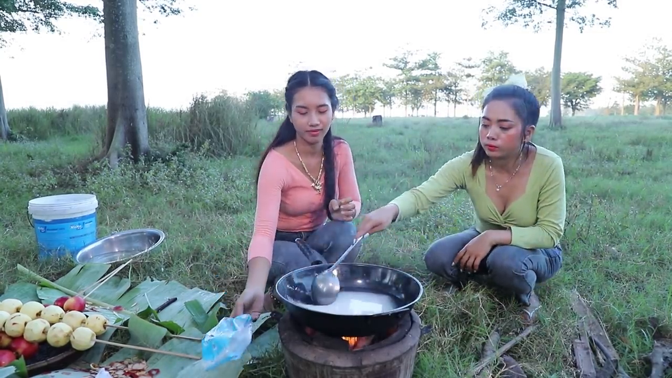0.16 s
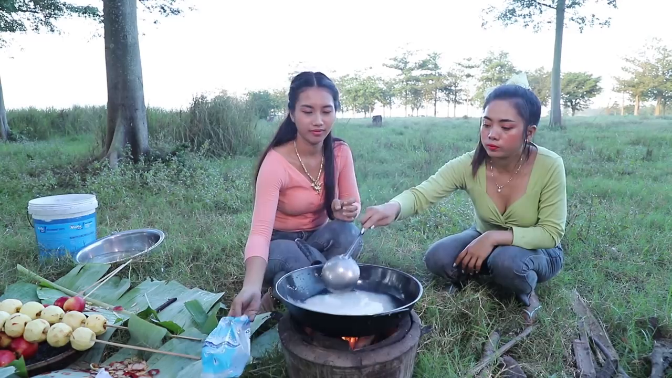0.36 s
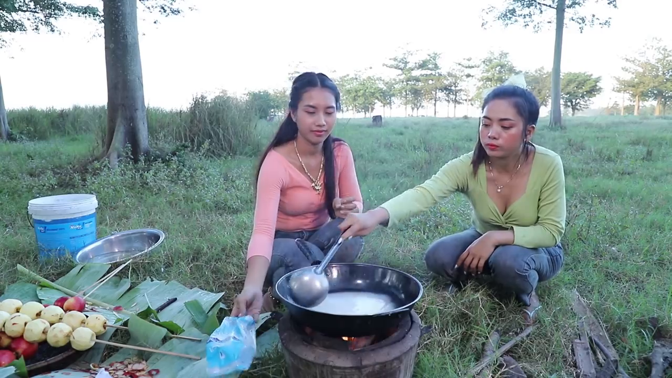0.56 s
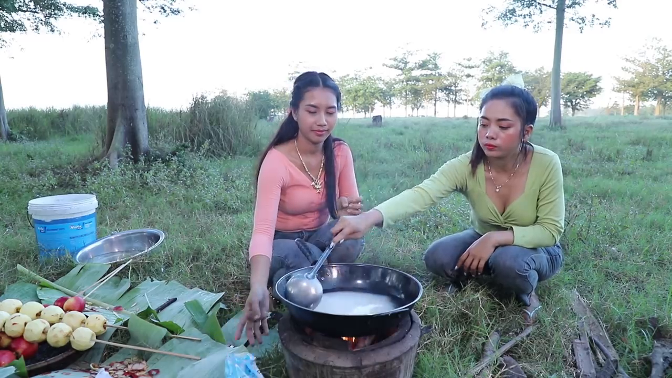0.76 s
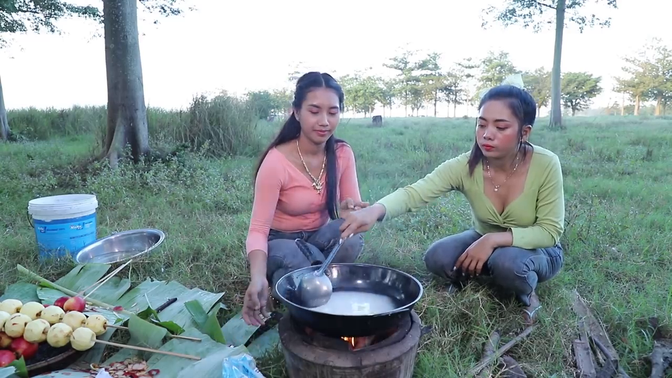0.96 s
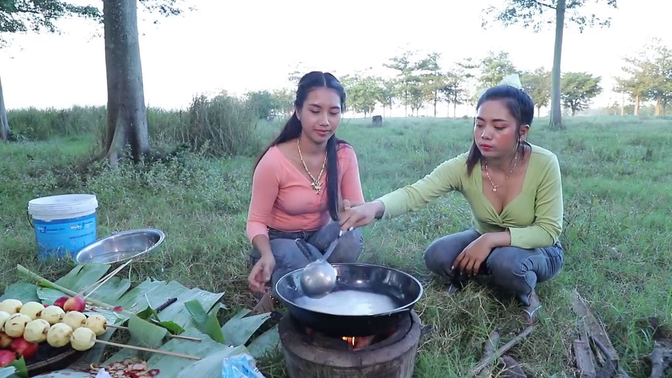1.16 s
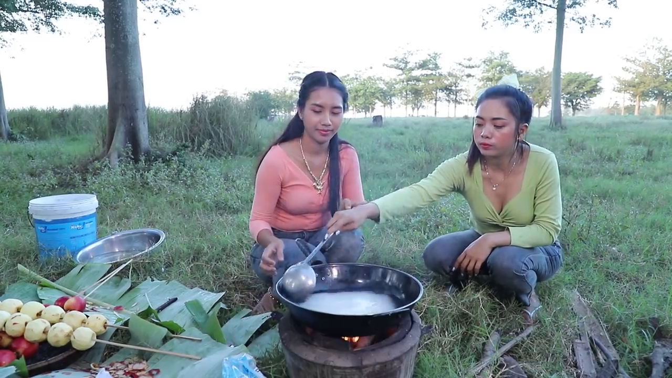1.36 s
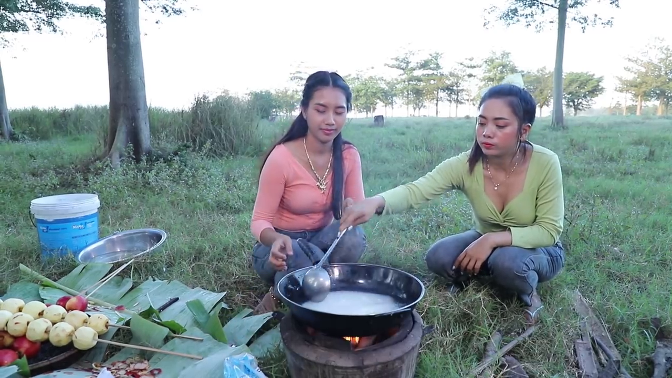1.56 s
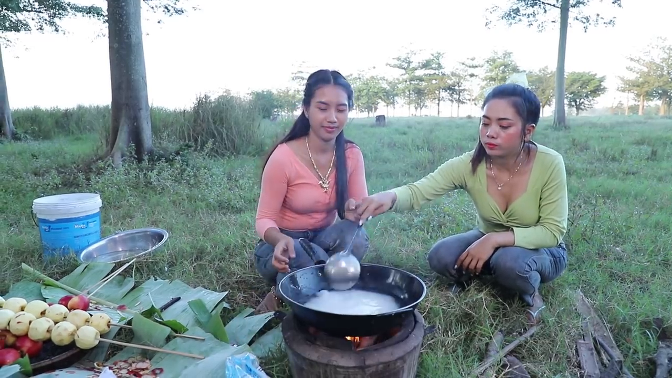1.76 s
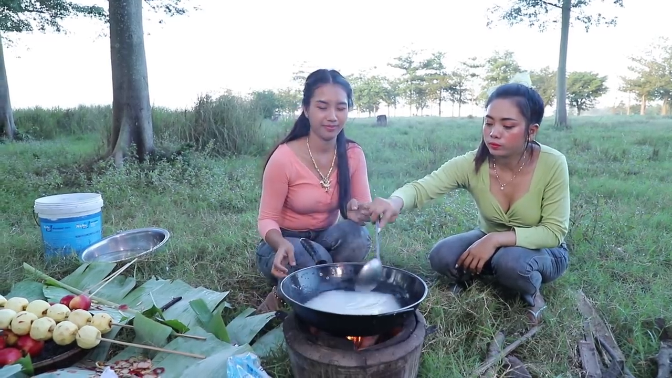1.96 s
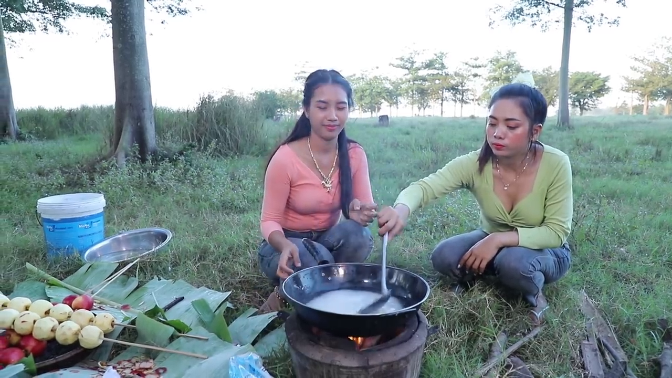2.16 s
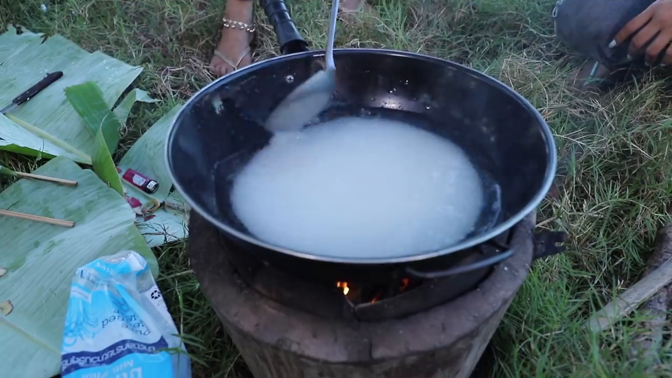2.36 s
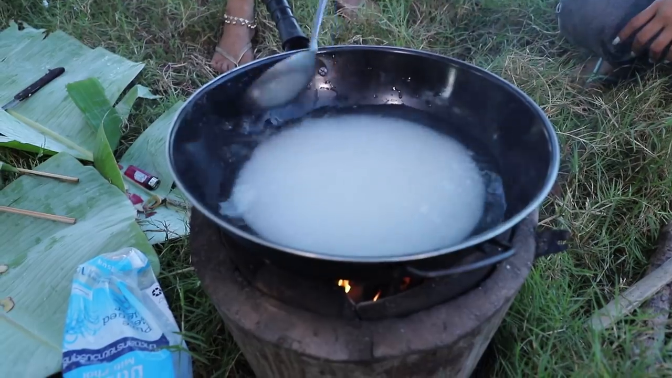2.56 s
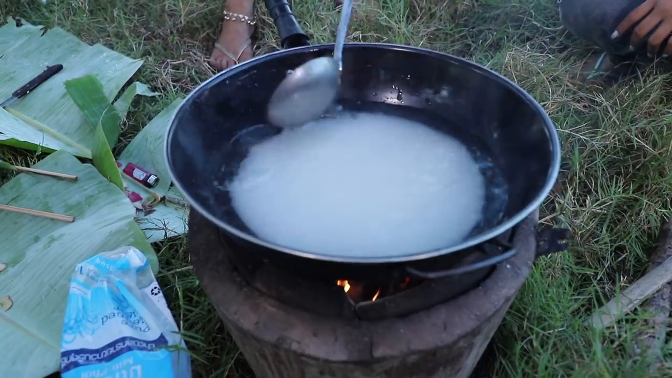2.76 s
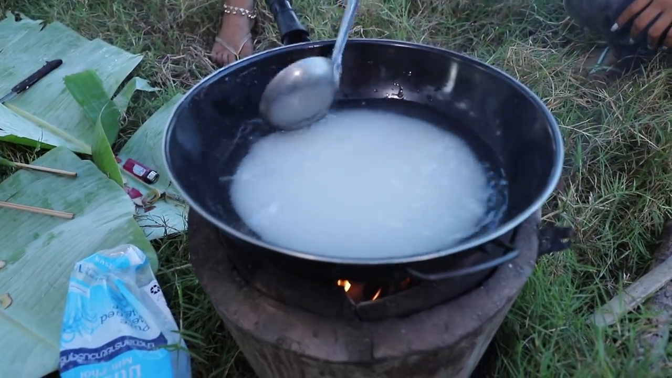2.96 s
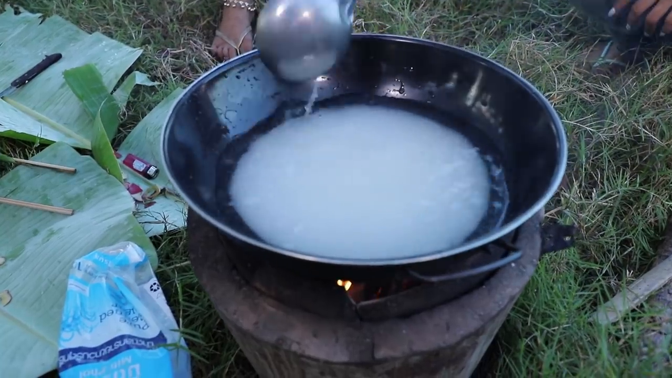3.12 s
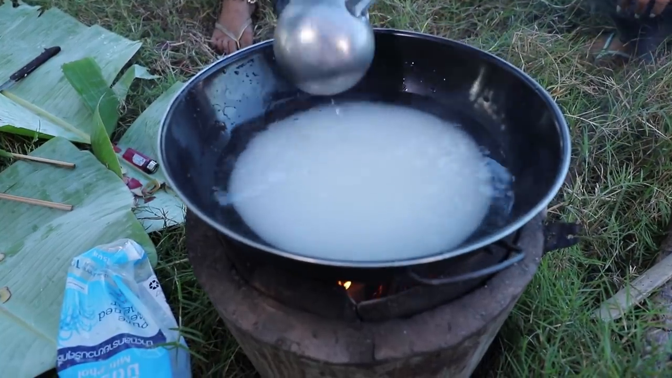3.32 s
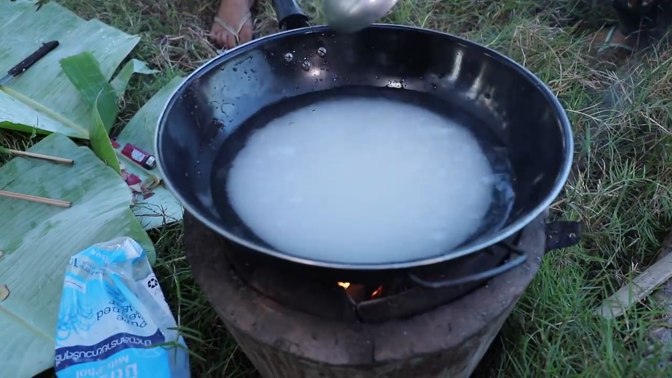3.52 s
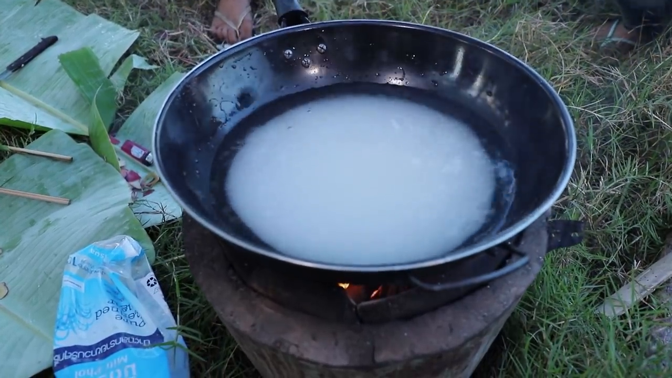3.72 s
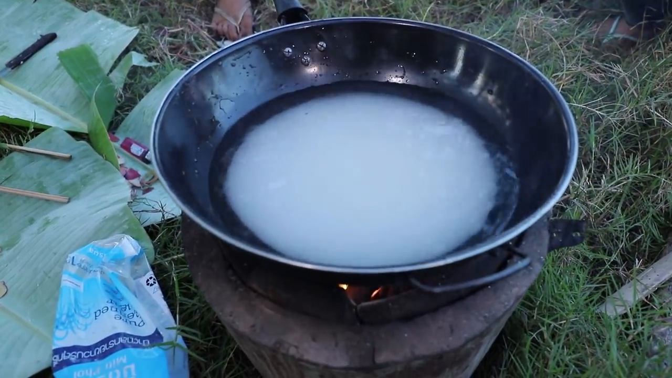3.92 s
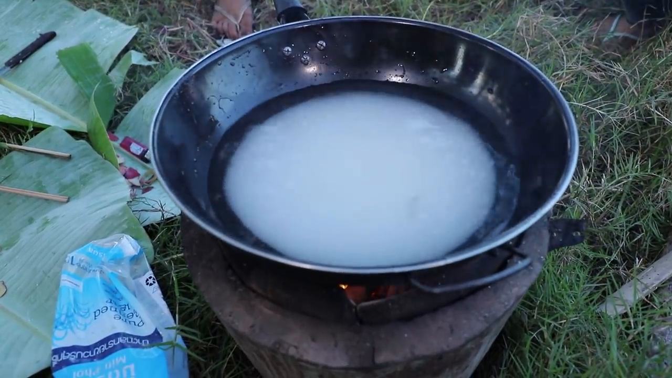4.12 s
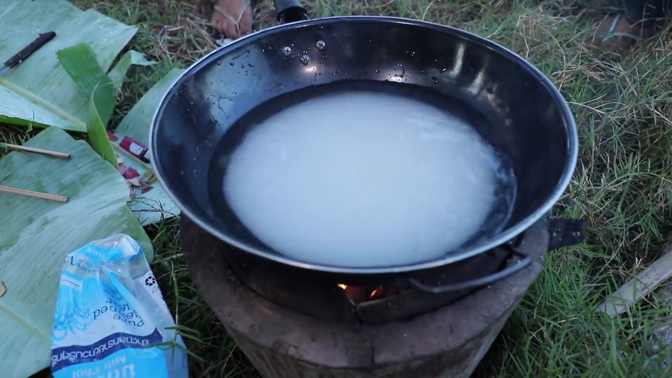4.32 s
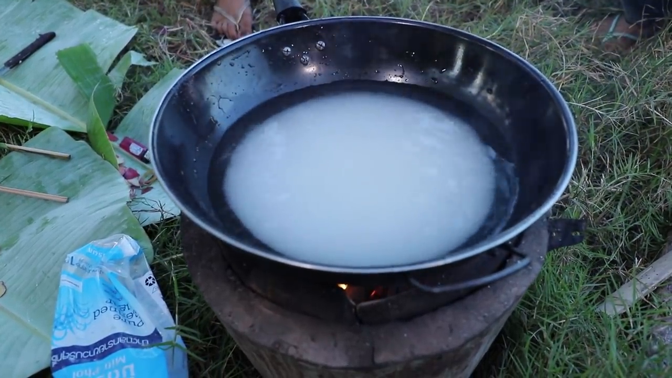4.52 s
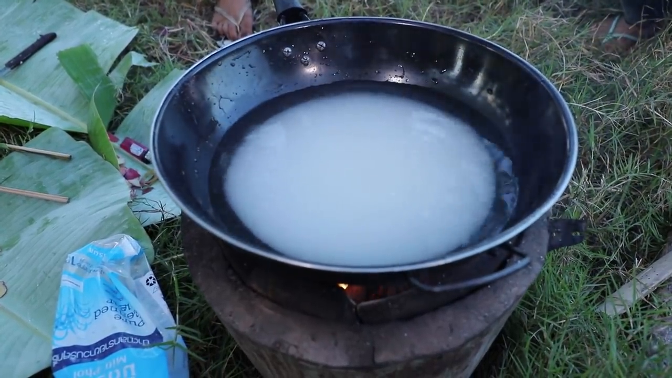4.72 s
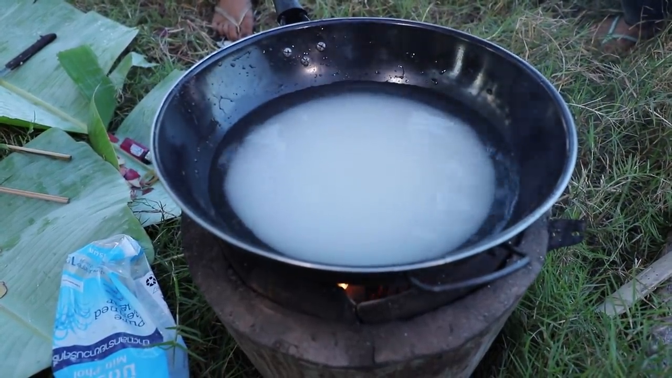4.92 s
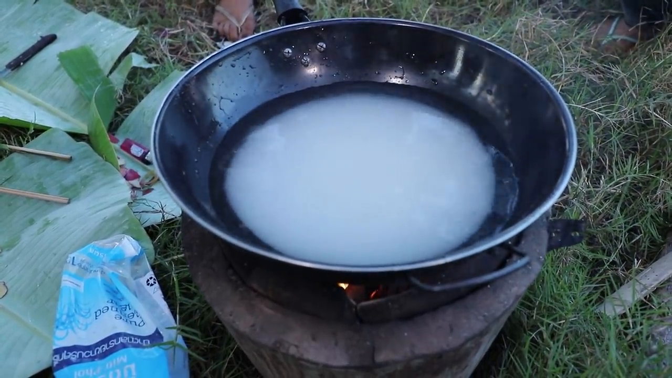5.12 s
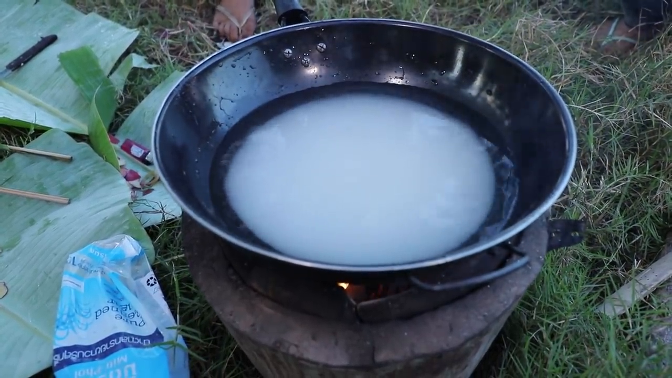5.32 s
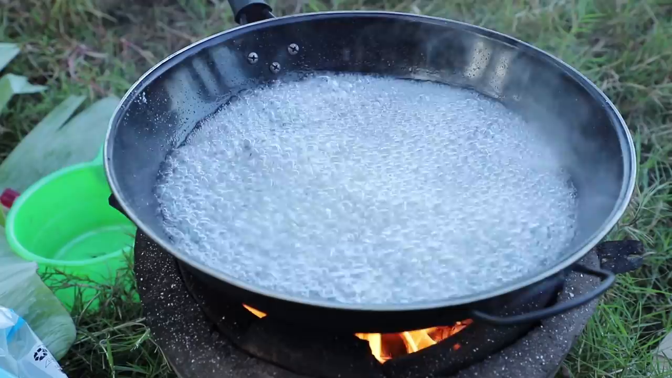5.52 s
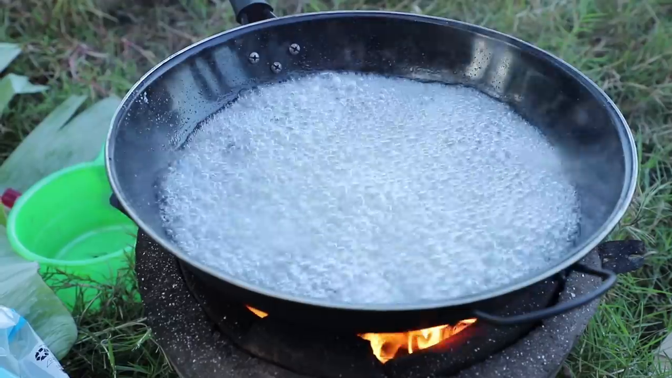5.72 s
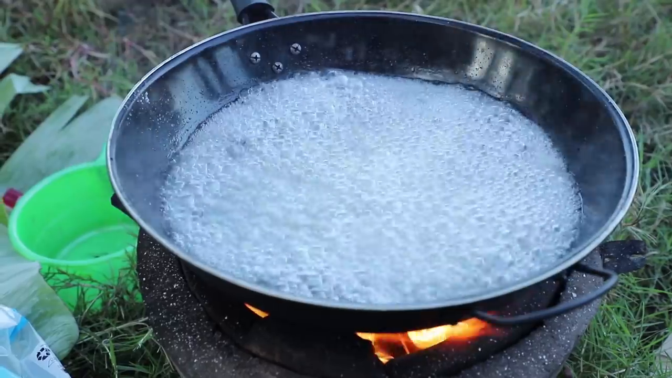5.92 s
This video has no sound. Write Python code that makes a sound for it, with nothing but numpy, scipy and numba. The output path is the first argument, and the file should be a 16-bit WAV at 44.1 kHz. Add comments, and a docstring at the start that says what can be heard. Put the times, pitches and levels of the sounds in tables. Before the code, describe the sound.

A metal ladle scrapes and knocks in a steel wok among buzzing insects, two loud clanks follow, then a cricket chirps and syrup boils.

```python
"""A ladle scrapes and squeals on a steel wok of hot sugar syrup, under bush crickets, a cricket trill and far engines.
Knocks ring the modes of the pan, stick-slip clicks drive them in scrapes, single wavering modes squeal.
Noise bursts make spits, ticks and fire snaps; gliding sines make the insects; slow sines make the drones.
Three scenes parted by short silences: wide, close with drips and a chirping cricket, then a foaming boil alone."""
import sys
import numpy as np
from scipy import signal
from scipy.fft import rfft, irfft, next_fast_len
from scipy.io import wavfile
from scipy.ndimage import uniform_filter1d
from numba import njit

SR = 44100
rng = np.random.default_rng(int(sys.argv[2]) if len(sys.argv) > 2 else 0)


def output_pcm(signal):
    """Save a mono or channel-first signal as 16-bit PCM at the path in sys.argv[1].

    Samples are clipped to [-1, 1] before scaling.
    """
    pcm = np.clip(np.atleast_2d(signal).T, -1, 1) * 32767
    wavfile.write(sys.argv[1], SR, np.round(pcm).astype(np.int16))


N = 263718
T = np.arange(N) / SR

# scenes: start [s], end [s]
WIDE, CLOSE, LATER = (0, 2.312), (2.348, 5.550), (5.589, 6.0)


def undb(db):
    """Decibels to gain."""
    return 10 ** (np.asarray(db) / 20)


def unit(x):
    """Scale to a standard deviation of 1."""
    return x / (np.std(x) + 1e-12)


def curves(rows):
    """Columns of a table as straight-line automation over time."""
    times, *columns = np.transpose(rows)
    return [np.interp(T, times, column) for column in columns]


def gate(start, end, ramp=0.00057):
    """1 between two times, with short ramps."""
    return np.clip((T - start) / ramp, 0, 1) * np.clip((end - T) / ramp, 0, 1)


def swell(start, length, attack, release):
    """Envelope of attack, hold and release."""
    return np.clip((T - start) / attack, 0, 1) * np.clip((start + length - T) / release, 0, 1)


def fade(t, t60):
    """Exponential decay by 60 dB in t60 seconds."""
    return np.exp(-np.log(1000) * t / max(t60, 1e-3))


def by_scene(wide_db, close_db):
    """Gain of a steady sound in the wide scene and after it."""
    return undb(np.where(T < WIDE[1], wide_db, close_db))


def walk(rate):
    """Random modulation: levels held 1 / rate s and smoothed twice; spread near 1."""
    hold = max(int(SR / rate), 1)
    steps = np.repeat(rng.standard_normal(N // hold + 1), hold)
    return 1.3 * uniform_filter1d(uniform_filter1d(steps, hold), hold)[:N]


def noise_at(size, hz):
    """A short random tremble of spread near 1, about hz changes a second."""
    place = np.arange(size) * hz / SR
    return np.interp(place, np.arange(SR // 100), rng.standard_normal(SR // 100))


def colour(x, points):
    """Causal (minimum-phase) filter through (frequency [Hz], gain [dB]) points."""
    size = 2 * next_fast_len(len(x))
    hz, db = np.transpose(points)
    bins = np.log(np.fft.rfftfreq(size, 1 / SR) + 1)
    log_gain = np.log(undb(np.interp(bins, np.log(hz), db)))
    # folding the cepstrum onto positive times makes the filter causal
    cepstrum = irfft(log_gain)
    cepstrum[1:size // 2] *= 2
    cepstrum[size // 2 + 1:] = 0
    return irfft(rfft(x, size) * np.exp(rfft(cepstrum)))[:len(x)]


def noise(points):
    """Coloured noise of rms 1."""
    return unit(colour(rng.standard_normal(N), points))


def crackle(rate, spread_db):
    """Random clicks of very unequal size, rms 1."""
    size = undb(spread_db * np.minimum(rng.exponential(size=N), 2 * np.pi))
    return unit((rng.random(N) < rate / SR) * size * rng.choice([-1, 1], N))


def add(out, s, x):
    """Mix x into out at time s."""
    i = max(int(s * SR), 0)
    out[i:i + len(x)] += x[:max(N - i, 0)]


def bursts(rows, points, t60):
    """A short, dying puff of coloured noise for each (time [s], level [dB]) row."""
    out, t = np.zeros(N), T[:SR // 12]
    for s, db in rows:
        puff = unit(colour(rng.standard_normal(len(t)), points))
        add(out, s, undb(db) * puff * fade(t, t60))
    return out


@njit
def resonate(x, hz, width):
    """Band-pass with a moving centre, gain 1 there."""
    y, band, low = np.empty(len(x)), 0., 0.
    for i in range(len(x)):
        g, damping = np.tan(np.pi * hz[i] / SR), width / hz[i]
        v = (band + g * (x[i] - low)) / (1 + g * (g + damping))
        band, low, y[i] = 2 * v - band, low + 2 * g * v, damping * v
    return y


# modes of the wok with the ladle against it: (frequency [Hz], level [dB], t60 [s])
WOK_MODES = [(175, -17, .15), (345, -14, .25), (520, -15, .1), (829, -10, .11), (1060, -6, .08),
             (1290, -8, .04), (1465, -10, .12), (1720, -10, .05), (2080, -15, .08), (2280, -14, .09),
             (2860, -2, .05), (3410, -12, .1), (3880, -21, .11), (4250, -15, .04), (5120, -9, .05),
             (5550, -8, .035), (6800, -3, .024), (7200, -4, .025), (8130, -5, .04), (8730, -4, .027),
             (9650, -12, .03), (12450, -11, .035), (12950, -10, .025), (14550, -8, .025)]
# tone of stick-slip rubbing: (frequency [Hz], gain [dB])
RUB_TONE = [(150, -44), (500, 4.5), (1100, 9.5), (2000, 9.5), (3500, -1.5), (5500, -3), (8000, -10),
            (11000, -11), (15500, -11.5)]
# ladle strokes across the pan:
# (start [s], length [s], level before the band gains [dB], growth over the stroke [dB], treble [dB])
STROKES = [(-.03, 0.47, -45, -6.5, -8), (.675, 0.098, -46, -3, -3), (0.764, 0.19, -40, -7, -6.5),
           (0.934, 0.186, -38, -2, -4), (1.543, 0.2355, -41, 3.5, -1), (2.677, .105, -40, -3, 5)]
SCRAPE_ATTACK_S, SCRAPE_RELEASE_S = 0.016, 0.023


def scrapes(contact_width_hz=55, bend=0.026, grit_db=-4, shift_db=4, split_hz=4500):
    """Stick-slip clicks ring the pan; the sliding contact damps its modes, bends them and favours them in turn."""
    slips = crackle(rate=4000, spread_db=3.5) * undb(1.5 * walk(180))
    ring = np.zeros(N)
    for hz, db, life in WOK_MODES:
        favour = undb(db + shift_db * walk(34.96)) * np.sqrt(life)
        bent_hz = np.minimum(hz * (1 + bend * walk(24)), SR / 2.3)
        ring += favour * resonate(slips, bent_hz, contact_width_hz + 3.3 / life)
    rub = colour(unit(ring) + undb(grit_db) * slips, RUB_TONE)
    high = unit(signal.sosfilt(signal.butter(4, split_hz, "high", fs=SR, output="sos"), rub))
    low = unit(signal.sosfilt(signal.butter(4, split_hz, fs=SR, output="sos"), rub))
    out = np.zeros(N)
    for start, length, db, growth_db, treble_db in STROKES:
        progress = np.clip((T - start) / length, 0, 1)
        envelope = swell(start, length, SCRAPE_ATTACK_S, SCRAPE_RELEASE_S)
        pressure = envelope * undb(db + growth_db * (progress - .5))
        out += pressure * (.5 * low + undb(treble_db) * high)
    return out


# syrup smears on the hot steel: (start [s], length [s], level [dB])
SMEARS = [(1.65, 0.13, -61), (2.73, 0.51, -54), (3.702, 0.51, -67)]
FIZZ_ATTACK_S, FIZZ_RELEASE_S = 0.061, 0.13
SIMMER_DB = (-60.5, -67)  # the steadily simmering rim: wide, close


def fizz():
    """Tiny steam bubbles burst where the syrup wets the hot wall: coloured crackle."""
    tone = [(500, -41), (1500, 2.0), (4000, 1.5), (7000, 3.5), (10000, -0.5), (15000, -12.0)]
    pops = colour(crackle(rate=2300, spread_db=1), tone)
    smears = sum(undb(db) * swell(start, length, FIZZ_ATTACK_S, FIZZ_RELEASE_S)
                 for start, length, db in SMEARS)
    return unit(pops) * (by_scene(*SIMMER_DB) + smears)


def drone(hz, gain, waver=0.0083, throb_db=0.86):
    """A far motor tone: a sine wavering in pitch and level in the air."""
    phase = 2 * np.pi * np.cumsum(hz * (1 + waver * walk(30.17))) / SR
    return np.sqrt(2) * gain * undb(throb_db * walk(12)) * np.sin(phase)


# speed of the far engine: (time [s], firing rate [Hz])
ENGINE_SPEED = [(0, 118.7), (.2, 125.2), (.5, 130.5), (.97, 123.5), (1.4, 130.4), (1.65, 130), (1.85, 124),
                (2.8, 121.8), (4, 125.3), (4.25, 121.1), (4.9, 126.4), (5.4, 120.8)]
MOTOR_HZ = 58.1  # a second, steady motor
# levels: wide [dB], close [dB]
ENGINE_DB, MOTOR_DB, MOTOR_THIRD_DB = (-40, -46.5), (-50.5, -57), (-54, -55.5)
# a vehicle far off gathers speed and is loudest as it passes
VEHICLE_PASS_S, VEHICLE_HZ, VEHICLE_HZ_PER_S = 4.55, 47.8, 4.8
VEHICLE_DB, VEHICLE_FADE_DB_PER_S = -53, 6.5


def engines():
    """Only the lowest tones of the motors carry this far: one engine, one steady motor, one passing vehicle."""
    engine = drone(curves(ENGINE_SPEED)[0], by_scene(*ENGINE_DB))
    motor = drone(MOTOR_HZ, by_scene(*MOTOR_DB))
    motor += drone(3 * MOTOR_HZ, by_scene(*MOTOR_THIRD_DB))
    since = T - VEHICLE_PASS_S
    vehicle_gain = undb(VEHICLE_DB - VEHICLE_FADE_DB_PER_S * np.abs(since))
    vehicle = drone(VEHICLE_HZ + VEHICLE_HZ_PER_S * since, vehicle_gain)
    return engine + motor + vehicle


# low rumble of traffic and fire: (frequency [Hz], level [dB per Hz])
RUMBLE_TONE = [(20, -38), (33, -19), (43, -21.5), (58, -4), (75, 1), (95, 6), (125, 7), (150, 9),
               (175, -2.5), (210, 5), (250, -11.5), (400, -34.5)]
# hiss of open air: (frequency [Hz], level [dB per Hz])
AIR_TONE = [(200, 5), (300, 2.5), (600, -1.5), (1000, -2), (1500, 0), (2500, -8), (3600, -8.5), (4400, -12),
            (5200, -12), (6200, -21.5), (9000, -18), (16000, -31)]
RUMBLE_DB, AIR_DB = (-48.5, -51), (-53.5, -55)  # wide, close


def outdoors():
    """Low rumble and the soft, slightly uneven hiss of the meadow, both coloured noise."""
    rumble = noise(RUMBLE_TONE) * by_scene(*RUMBLE_DB)
    air = noise(AIR_TONE) * by_scene(*AIR_DB) * undb(.5 * walk(23))
    return rumble + air


def bush_cricket(rate, start_hz, end_hz):
    """Each wing stroke is a falling whistle; the grass scatters it a little."""
    stroke = np.cumsum(rate * (1 + .003 * walk(20))) / SR % 1
    hz = start_hz + (end_hz - start_hz) * stroke + 90 * walk(370)
    whistle = np.sin(2 * np.pi * np.cumsum(hz) / SR)
    return unit(np.sin(np.pi * stroke) ** 1.75 * whistle) * undb(0.41 * walk(110))


# bush crickets: wing strokes per second, start [Hz], end [Hz]
STEADY_CRICKET, PAUSING_CRICKET = (134.7, 11900, 10250), (152.5, 12850, 11500)
# the pausing cricket rests at even intervals
FIRST_REST_S, REST_EVERY_S, REST_S = .58, .745, .11


def insects(steady_db=-55, pausing_db=-59, wide_db=-2.5, chorus_db=-59, far_chirp_db=-66):
    """Two near bush crickets over noise bands for a far chorus of their kind and of field crickets."""
    awake = (T - FIRST_REST_S) % REST_EVERY_S > REST_S
    singing = uniform_filter1d(1. * awake, size=2600)
    chorus = noise([(9000, -60), (10300, -11.5), (11150, -7), (11700, -10), (13000, -42)])
    field_band = noise([(4200, -32), (4900, -12), (5350, -19.0), (6100, -35)])
    far = field_band * undb(far_chirp_db + walk(30))
    buzz = undb(steady_db) * bush_cricket(*STEADY_CRICKET)
    buzz += undb(pausing_db) * singing * bush_cricket(*PAUSING_CRICKET)
    buzz += undb(chorus_db) * chorus
    return buzz * undb(wide_db * gate(*WIDE)) + far


def far_trill(end_s=.66, db=-60.5):
    """A distant field cricket trills at first, smeared by the trees into a noise band, and then stops."""
    song = noise([(4700, -40), (5150, -8), (5380, 0), (5550, -8), (5900, -40)])
    return song * undb(db + 2.5 * walk(30)) * swell(-.1, end_s + .1, .05, .05)


# single modes sung by the sliding ladle: (time [s], length [s], start frequency [Hz], level [dB])
SINGING_MODES = [(.005, 0.18, 1850, -51), (.12, 0.17, 1340, -42), (.96, 0.15, 1247, -42),
                 (1.52, 0.21, 5360, -42), (1.575, 0.16, 1840, -42), (1.575, .08, 4080, -45),
                 (1.618, 0.11, 3530, -36), (1.638, 0.056, 2260, -40), (2.636, 0.042, 847, -30),
                 (2.647, 0.073, 2370, -36), (2.655, .08, 3520, -37), (2.68, .07, 2190, -40),
                 (2.638, .05, 2950, -31), (2.705, 0.045, 2970, -42)]
SQUEAL_SAG = .05  # share by which the pitch falls as the contact moves on


def squeals(width_hz=60, waver=0.0086):
    """Friction keeps one mode ringing, unevenly, while the contact point moves; it swells, sags and dies."""
    out = np.zeros(N)
    for start, length, start_hz, db in SINGING_MODES:
        u = np.linspace(0, 1, int(length * SR))
        hz = start_hz * (1 - SQUEAL_SAG * u) * (1 + waver * noise_at(len(u), width_hz))
        phase = 2 * np.pi * np.cumsum(hz) / SR
        tone = (.8 + .6 * noise_at(len(u), 2 * width_hz)) * np.sin(phase)
        tone += .6 * noise_at(len(u), 4 * width_hz) * np.cos(phase)
        add(out, start, undb(db) * np.sin(np.pi * u) * tone)
    return out


# dense, quickly dying clack of a contact: (frequency [Hz], gain [dB])
CLACK_TONE = [(50, -88), (180, -0.5), (480, -2.5), (850, -0.5), (1400, 1.5), (2300, -5.5), (3900, -7),
              (5500, -3.5), (6900, -12), (9300, -8), (11000, -25), (14500, -8), (16500, -32)]
# ladle blows:
# (time [s], nominal peak [dB], body [Hz], body [dB], bass [dB], treble [dB], clack t60 [s])
BLOWS = [(0.307, -27.5, 1300, -1, 0, -14, 0.0088), (0.344, -25, 1290, 3, -2, -10, 0.0077),
         (0.5032, -21, 930, -3, -1, -1.5, 0.0066), (0.7098, -19.5, 1370, -9.5, -4, -2, 0.013),
         (0.7566, -12.5, 1052, -4.5, -3.5, 1.5, 0.093), (1.1136, -21, 1210, 10.5, -3, 6, 0.071),
         (1.4439, -12, 890, -4, 3.5, 0, 0.1), (1.6788, -17, 1480, 16.5, -11, 12, 0.029),
         (1.762, -26.5, 1300, 25, -14, 13, 0.029), (2.3496, -24, 1520, 4.5, -21, 2.5, .1),
         (2.6372, 1.5, 800, 8, 4, 8, .014), (2.6728, -11.5, 900, -2, 2, 1, .05),
         (2.7600, -19.5, 1300, 6, -21, 15, 0.027), (2.7763, -21.5, 2580, 10, -13, 2, 0.04),
         (3.0062, -1.5, 1130, 15, 0, 6, .016), (3.0408, -11, 1490, 0, -28, 13, .008)]
# hard blows and long contacts wake the modes more: share for a full-scale 31 ms clack, and how it grows
RING_DB, RING_DB_PER_DB, RING_DB_PER_DOUBLING = -3.5, 0.93, 6


def knocks(scatter_db=-1.5, detune=0.0064):
    """Each blow is a short clack plus the modes of the pan, weighted by where the ladle lands."""
    out, t = np.zeros(N), T[:SR // 3]
    for s, db, body_hz, body_db, bass_db, treble_db, t60 in BLOWS:
        chance = rng.standard_normal((len(WOK_MODES), 3))
        ring = np.zeros(len(t))
        for (hz, mode_db, life), (louder, sharper, sign) in zip(WOK_MODES, chance):
            mode = fade(t, life) * np.sin(2 * np.pi * hz * (1 + detune * sharper) * t)
            ring += undb(mode_db + scatter_db * louder) * np.sign(sign) * mode
        ring_db = RING_DB + RING_DB_PER_DB * db + RING_DB_PER_DOUBLING * np.log2(t60 / 0.031)
        clack = unit(colour(rng.standard_normal(len(t)), CLACK_TONE)) * fade(t, t60)
        tone = [(body_hz / 2, bass_db), (body_hz, body_db), (2 * body_hz, 0), (8000, treble_db)]
        blow = colour(clack + undb(ring_db) * ring, tone)
        peak = 3.75 * np.std(blow[:SR // 300])  # nominal, from the onset
        add(out, s, blow / peak * undb(db))
    return out


# syrup specks on the hot wall: (time [s], level [dB])
SPECKS = [(1.233, -45), (2.431, -35.5), (2.5100, -36), (3.672, -43)]


def spits(t60=.011):
    """Single specks of syrup burst on the steel with a bright tick of noise."""
    tone = [(1000, -20), (3500, -12), (5500, -1), (8000, 0), (11000, -12), (15000, -9)]
    return bursts(SPECKS, tone, t60)


def ticking(db=-47, t60=0.011):
    """A short, even train of faint dry noise ticks, like an insect's in the grass."""
    times = np.arange(1.82, 2.3, .0708)
    return bursts([(s, db) for s in times], [(3000, -40), (5500, 2), (8000, 1), (11000, -18)], t60)


# syrup drips from the ladle: (time [s], level [dB], bubble [Hz], t60 [s], tick relative to bubble [dB])
DRIPS = [(3.0430, -16.5, 3400, 0.022, -15), (3.2936, -25, 1276, 0.067, -1.5)]


def drops():
    """The surface breaks with a fine tick and a trapped bubble rings as a dying sine."""
    out, t = np.zeros(N), T[:SR // 8]
    tick_tone = [(1000, -22), (4000, -6), (9000, 16.0), (15000, -15)]
    for s, db, hz, t60, tick_db in DRIPS:
        tick = unit(colour(rng.standard_normal(len(t)), tick_tone)) * fade(t, 0.006)
        bubble = np.sin(2 * np.pi * hz * t) * fade(t, t60)
        add(out, s, undb(db) * (bubble + undb(tick_db) * tick))
    return out


FIRST_CHIRP_S, CHIRP_EVERY_S = 3.355, .1415
CHIRP_DB, SONG_RISE_S = -46.5, .1  # the fade-in is centred on the first chirp


def field_cricket(count=9, syllable_s=0.0167, period_s=.0234, start_hz=5450, fall_hz=800,
                  echo_db=-5, opening_db=-3, scatter_db=1.7):
    """Chirps of four syllables that hold and then fall, the first one softer; the trees answer faintly."""
    out, t = np.zeros(N), T[:int(syllable_s * SR)]
    u = t / syllable_s
    for s in FIRST_CHIRP_S + CHIRP_EVERY_S * np.arange(count):
        for k, (loud, late, sharp) in enumerate(rng.standard_normal(size=(4, 3))):
            hz = start_hz + 40 * sharp - fall_hz * u ** 2
            syllable = np.sin(np.pi * u) * np.sin(2 * np.pi * np.cumsum(hz) / SR)
            level_db = CHIRP_DB + scatter_db * loud + opening_db * (k == 0)
            add(out, s + k * period_s + 0.00037 * late, syllable * undb(level_db))
    out *= np.clip(.5 + (T - FIRST_CHIRP_S) / SONG_RISE_S, 0, 1)
    trees = rng.standard_normal(SR // 5) * fade(T[:SR // 5], 0.52)
    return out + undb(echo_db) * signal.fftconvolve(out, trees / np.linalg.norm(trees))[:N]


# soft snaps of the firewood: (time [s], level [dB])
WOOD_SNAPS = [(4.298, -43), (5.296, -47)]


def fire(t60=0.096):
    """Dull snaps of the wood under the pan: dying bursts of dark noise."""
    tone = [(300, -12), (1400, 0), (2500, -10), (3500, -10), (6000, -13), (8000, -26), (15000, -30)]
    return bursts(WOOD_SNAPS, tone, t60)


# tone of the rolling boil: (frequency [Hz], level [dB per Hz])
BOIL_TONE = [(25, -18), (55, 1), (85, -5), (170, -5), (270, -13), (450, -13), (750, -11), (1500, -10.5),
             (3500, -18), (6000, -17), (8500, -14.5), (10300, -21), (13500, -21), (16000, -27)]
# vigour of the boil: (time [s], level before the foam and bubble mix [dB])
BOIL_VIGOUR = [(5.59, -44.5), (5.63, -42.8), (5.69, -44), (5.77, -42.5), (5.88, -44.3), (5.98, -44.2)]


def boil(count=200):
    """Foam: a dense crackle of bursting films with short rising bubble tones in it."""
    bubbles, t = np.zeros(N), T[:SR // 30]
    for when, pitch, size in rng.random((count, 3)):
        hz = 700 * 13 ** pitch
        life = 24 / hz
        rising = hz * (1 + .1 * np.minimum(t / life, 1))
        # small bubbles ring briefly but burst more sharply
        bubble = size ** 3 * hz ** .35 * fade(t, life) * np.sin(2 * np.pi * rising * t)
        add(bubbles, LATER[0] + when * (T[-1] - LATER[0]), bubble)
    foam = unit(colour(crackle(rate=11000, spread_db=2.4), BOIL_TONE)) * undb(.7 * walk(120))
    bubbles /= np.std(bubbles[T > LATER[0]])
    return undb(curves(BOIL_VIGOUR)[0]) * (.95 * foam + .22 * bubbles)


def scene():
    """Stirring in the wide and close scenes, the boil alone in the last."""
    pan = scrapes() + fizz() + squeals() + knocks() + spits() + drops() + fire()
    meadow = engines() + outdoors() + insects() + far_trill() + ticking() + field_cricket()
    stirring = (pan + meadow) * (gate(*WIDE) + gate(*CLOSE))
    return (stirring + boil() * gate(*LATER))[None]


TOP_HZ = 16000


def record(dry):
    """Clip hard at full scale, then cut the top with a steep low-pass."""
    top_cut = signal.ellip(8, .2, 80, TOP_HZ, fs=SR, output="sos")
    return signal.sosfilt(top_cut, np.clip(dry, -1, 1))


dry = scene()
out = record(dry)
output_pcm(out)
```